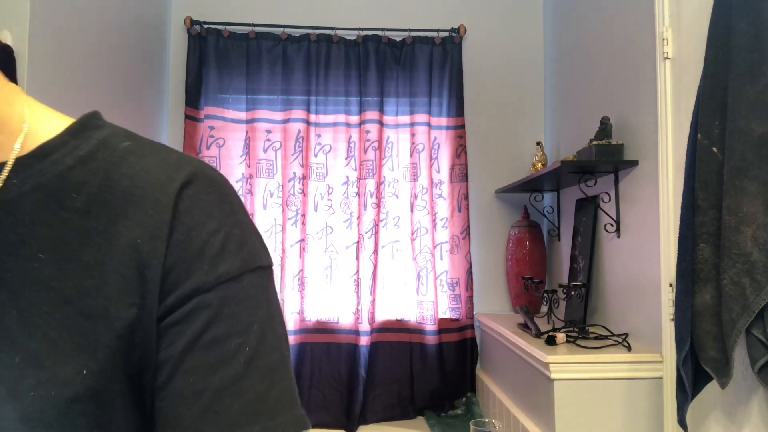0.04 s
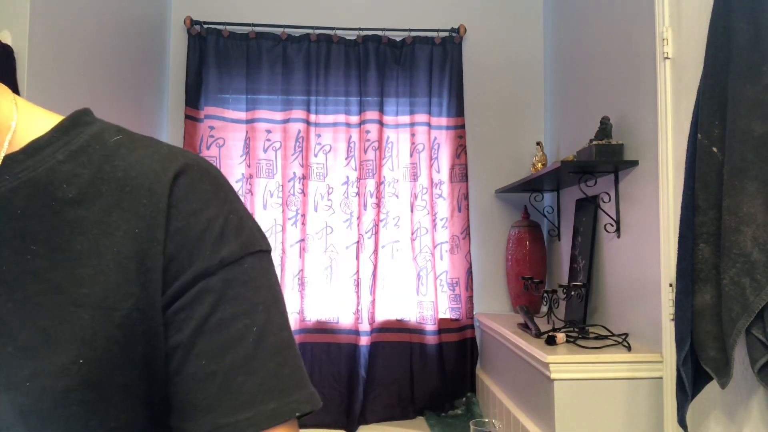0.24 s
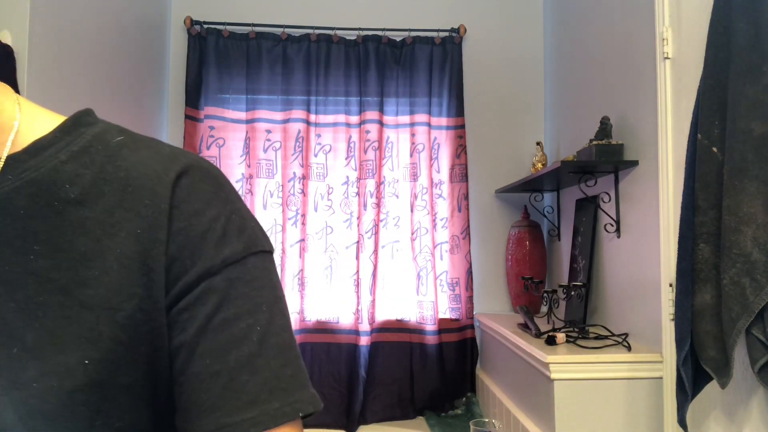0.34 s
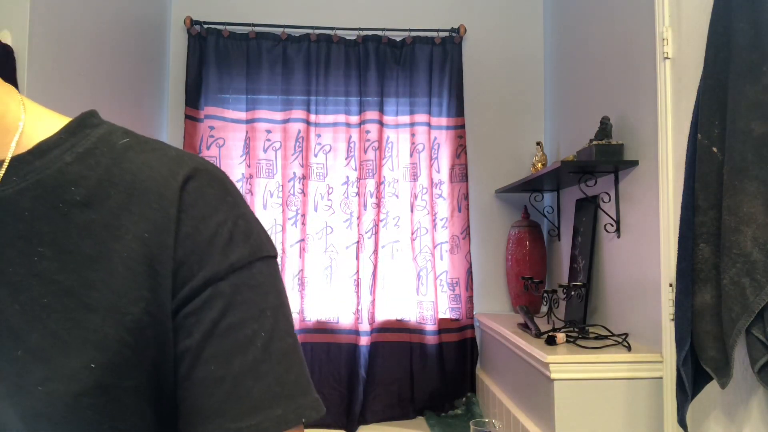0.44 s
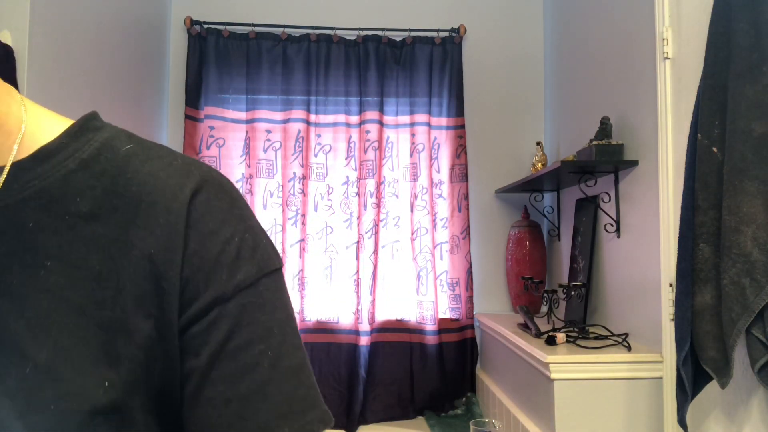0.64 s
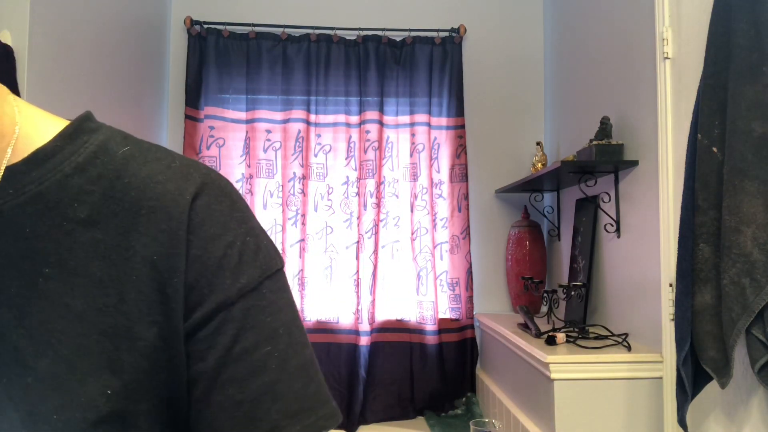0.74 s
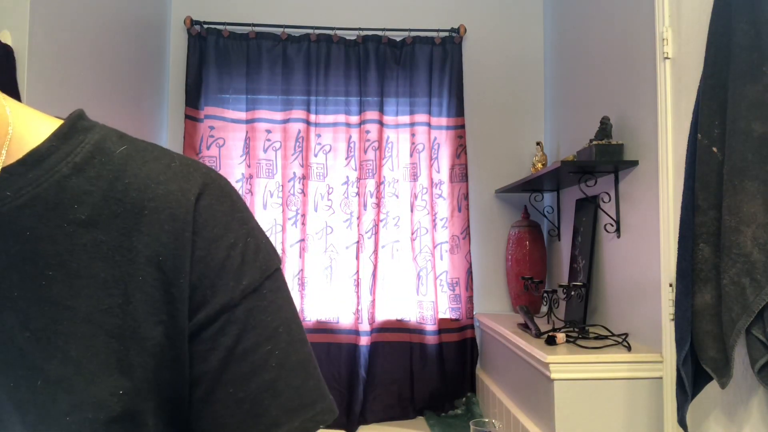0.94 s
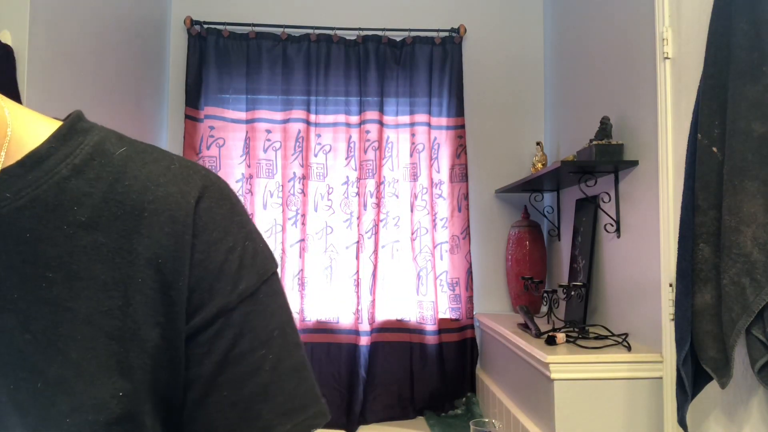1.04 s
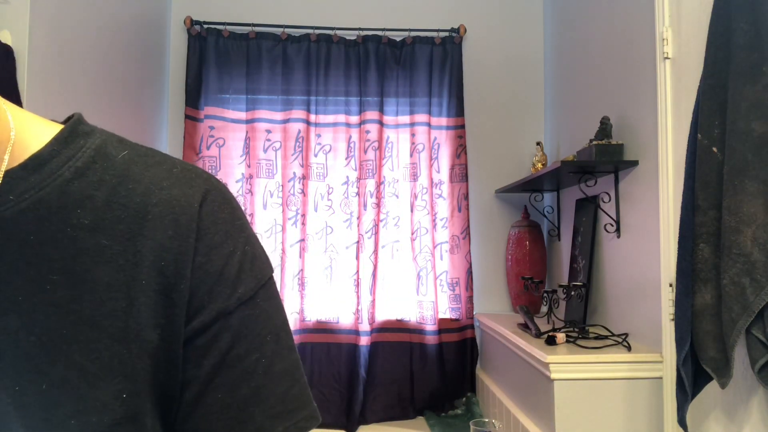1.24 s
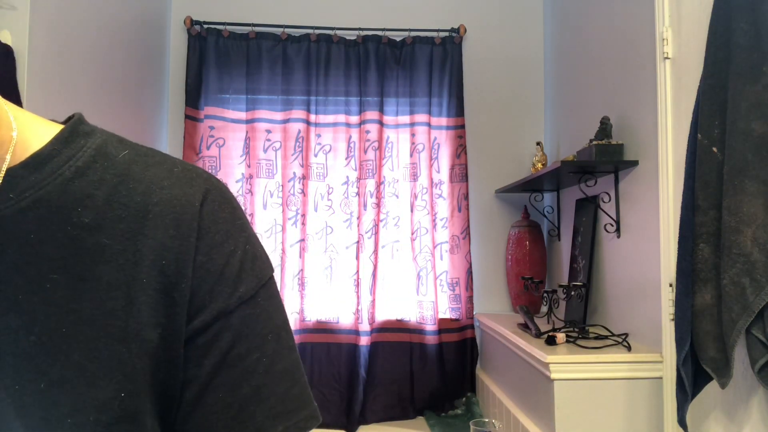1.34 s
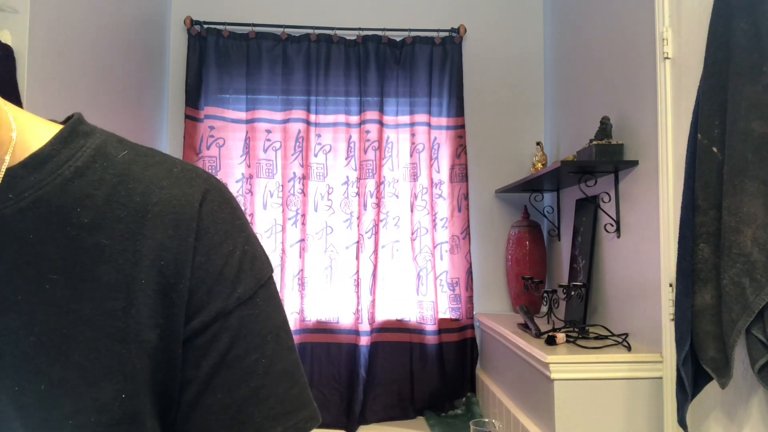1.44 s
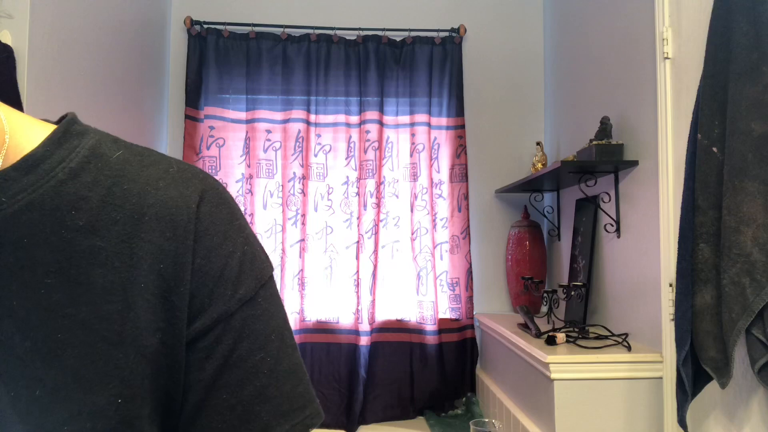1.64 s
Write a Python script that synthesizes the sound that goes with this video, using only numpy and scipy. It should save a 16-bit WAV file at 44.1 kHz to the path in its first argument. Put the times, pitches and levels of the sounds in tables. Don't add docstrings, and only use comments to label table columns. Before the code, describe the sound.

Plastic cosmetic containers clatter in short bursts, with dull thuds from the hollow counter beneath and bright clicks on top, strongest in the second half; lively tiled room, faint hum, close handheld microphone.

```python
import sys
import numpy as np
from scipy import signal
from scipy.fft import rfft, irfft
from scipy.io import wavfile

SR = 44100
rng = np.random.default_rng(int(sys.argv[2]) if len(sys.argv) > 2 else 0)


def file_out(sig):
    cols = np.atleast_2d(sig).T
    lim = np.clip(cols, -1, 1)
    pcm = np.round(lim * 32767).astype(np.int16)
    wavfile.write(sys.argv[1], SR, pcm)


def invert_db(x):
    u = np.asarray(x, float) / 20
    return 10 ** u


N = 74970

# f/Hz, level/dB (per Hz)
HUM_SPECTRUM = [(18, -21), (70, 13), (221, 13), (374, 12), (1250, 5.5), (1720, 1), (7270, -29),
                (13700, -15), (16000, -59)]
# f/Hz, T60/s, level/dB
WALL_DECAY = [(78.5, 0.65, -2.5), (150, 0.54, -25.5), (410, 0.6, -5.5), (1020, 0.37, -5),
              (2740, 0.47, -10.5), (7000, 0.43, -13.5), (11500, 0.24, -22), (15500, .32, -16)]
# t/s, peak
# level/dB, f/Hz, T60/s
BOOMS = [(.32, -33.5, 130, 0.37), (0.27, -24, 190, 0.37), (.312, -33, 400, 0.45), (.3, -30, 212, .4),
         (.33, -36, 500, .5), (.4, -42, 560, .7), (.7415, -17.5, 545, 0.13), (0.748, -28, 68, 0.35),
         (.745, -32, 80, 0.53), (.745, -29, 108, 0.43), (.742, -29.5, 570, 0.68), (0, -39.5, 80, .2),
         (0, -42, 116, 0.28), (0.044, -41.5, 118, .2), (1.105, -45.5, 104, .4), (0.9, -47.5, 71, 0.55),
         (1.2, -46, 80, .5), (1.25, -45, 111, .4), (1.31, -42, 101, .3), (1.365, -40.5, 85, 0.33),
         (1.44, -48, 110, 0.36), (1.58, -52, 70, 0.5), (.178, -37, 240, .4), (.735, -25, 400, .2),
         (.735, -27, 1100, .12), (.8, -36, 250, .6), (1.35, -33, 545, .35), (1.6, -46, 350, .6),
         (.01, -42, 330, .4), (.252, -32, 1500, .1), (.44, -43, 350, .6)]
# f/Hz, level/dB, T60/s
COUNTER_MODES = [(158, -19.5, 0.1), (218.5, -12.5, 0.64), (262, -13, .55), (310, -18, .4), (356, -17, .6),
                 (415, -14, 0.25), (500, -21, 0.4), (570, -19, .35), (690, -24, 0.27), (810, -27, 0.47),
                 (868, -29, 0.24), (1100, -31, 0.05), (1262, -22, 0.089), (1500, -24, 0.034)]
# f/Hz, bandwidth/Hz, level/dB
CASE_MODES = [(2500, 120, -1.5), (4670, 94, -7.5), (5870, 240, -9.5), (7220, 130, -5), (7900, 34, 0),
              (13600, 230, -15)]
# start t/s, length/s, level/dB, brightness f/Hz, relative counter drive/dB
RATTLES = [(-.02, 0.088, -46, 2500, 14), (0.158, 0.091, -56.5, 1800, 20.5), (0.245, 0.017, -32, 2500, 13.5),
           (0.273, 0.046, -27.5, 2500, 9.5), (0.449, 0.028, -54.5, 9000, -11.5),
           (0.635, 0.09, -56, 4000, 4), (0.724, 0.0028, -29, 4870, -2), (0.727, 0.0047, -21.5, 3500, 6),
           (.74, .07, -44, 7000, 0), (1.093, 0.009, -48.5, 3000, 16), (1.131, 0.103, -55, 2780, 20),
           (1.193, 0.0097, -42.5, 3670, 5.5), (1.214, 0.093, -45.5, 2500, 7),
           (1.3, 0.022, -19.5, 5000, -6.5), (1.266, 0.064, -23, 1500, -16), (1.325, 0.096, -31, 5560, -9),
           (1.475, 0.21, -52.5, 3580, 6)]
# t/s, peak level/dB, pitch f/Hz, relative counter ring/dB
THUDS = [(.03, -33, 219, 0), (.044, -28, 404, -6), (.084, -35, 512, -2), (.171, -37, 900, 0),
         (.18, -38, 240, 5), (0.2026, -19.5, 880, -28), (.2035, -27.5, 483, -22), (.251, -20, 390, 5.5),
         (.258, -20, 244, 13), (.297, -14.5, 227, -15), (0.308, -12, 428, -6), (.319, -19, 480, -21),
         (.333, -17.5, 245, 5.5), (0.731, -12, 1124, -7), (.7335, -20, 720, -17), (.746, -22, 700, -15),
         (0.7378, -12.5, 250, -31), (.779, -23.5, 220, -16), (1.096, -30.5, 600, -8),
         (1.098, -29.5, 250, -1), (1.139, -30.5, 600, 2), (1.156, -21, 530, -12), (1.294, -20.5, 488, -29),
         (1.309, -17, 655, -4), (1.343, -17, 292, -4.5), (1.412, -19, 263, -21), (1.4124, -23, 383, -20),
         (1.614, -40, 415, 3), (1.641, -39, 256, 5), (1.679, -35, 540, -15)]
# t/s, peak level/dB, main mode f/Hz, weaker second mode f/Hz, relative
# crack/dB
TICKS = [(.0064, -29, 3520, 2800, -5), (0.0426, -31, 3600, 6140, 5), (0.0696, -23.5, 7100, 2720, -23),
         (0.07, -25, 4860, 4300, -23), (.148, -44, 9300, 11500, 5), (.187, -46, 4530, 7000, 4),
         (0.2513, -27, 2500, 7000, -10), (0.261, -41, 2920, 8650, 9), (.279, -26, 4950, 7930, -4),
         (0.285, -18.5, 4930, 7500, -19), (0.3066, -15.5, 5450, 3700, -28),
         (.601, -57, 5000, 7500, 2), (0.6194, -45, 1050, 6130, 8), (.6374, -54, 3810, 6430, -4),
         (0.6686, -48.5, 2050, 5800, 4), (.681, -50, 1500, 3000, 2), (0.719, -46, 2680, 6740, 14),
         (0.7296, -11.5, 2304, 4160, -1), (0.7332, -14.5, 4870, 7200, 1.5),
         (0.7349, -17.5, 7300, 14500, 6.5), (.7365, -19, 14600, 12500, -12),
         (0.7377, -12.5, 5800, 2500, -18), (0.995, -46.5, 2520, 4930, 1),
         (1.0645, -59, 5370, 8100, 3),
         (1.0964, -35.5, 1950, 5000, 2.5), (1.1028, -35, 1840, 3900, -14),
               (1.154, -29, 2500, 7600, -23), (1.156, -26, 5400, 3120, -24), (1.1768, -32, 2760, 6440, 0),
               (1.2023, -24, 3600, 4700, 9.5), (1.2093, -27.5, 4800, 5900, 5), (1.254, -27, 3400, 8100, 15),
               (1.265, -24, 3320, 8800, -1), (1.2805, -31, 2700, 5500, 0), (1.2866, -15, 4870, 2500, -4),
               (1.2889, -19.5, 9000, 4900, 11.5), (1.3059, -19, 2500, 5950, 13),
               (1.311, -22, 6300, 3500, 6), (1.3185, -22.5, 2850, 7300, 11), (1.332, -24, 14600, 4000, 4),
               (1.3366, -14, 4600, 3940, 5), (1.3384, -13, 5000, 4240, -2), (1.3419, -10, 12900, 9400, -9),
               (1.3407, -3.5, 7390, 8150, 0.5), (1.3851, -8.5, 5660, 2760, -3.5),
               (1.517, -38, 3250, 8000, 0), (1.5575, -28, 4250, 8300, 5), (1.56, -35, 1710, 5550, -6),
               (1.5709, -38.5, 1660, 7900, 8), (1.6757, -34, 3770, 7200, -0.5), (1.684, -44, 2620, 1800, 1)]

HUM_DB = -59
ROOM_GAP_S = 0.0011
TICK_WET_DB, THUD_WET_DB, RATTLE_WET_DB = 0.5, -1.5, 0.3
BOOM_RISE_S, BOOM_WOBBLE_DB, BOOM_WOBBLE_S = 0.0022, 4, 0.018
COUNTER_DAMP = 0.25
RATTLE_PER_S, RATTLE_SCATTER_DB = 9000, 2.5
RATTLE_EDGE_S, RATTLE_SWELL, RATTLE_FADE_S = 0.00068, 0.11, 0.027
THUD_CYCLES, THUD_TRIM_DB = 2.24, 7.5
TICK_WIDTH, TICK_SECOND_DB, TICK_RISE_S, TICK_TRIM_DB = 0.09, -10, 0.00039, 8
CRACK_DB, CRACK_S, CRACK_HZ = -13, 0.0022, 3400
MIC_LOW_HZ, MIC_ROLL_HZ, TOP_HZ, LIMIT = 51.6, 9000, 15700, 1


def level(x, db):
    return x * invert_db(db) / np.sqrt(np.mean(x ** 2))


def band(x, hz, width):
    return signal.lfilter(*signal.iirpeak(min(hz, .45 * SR), hz / max(width, 5), fs=SR), x)


def along(table, hz, axis):
    table = np.array(table)
    return np.interp(np.log(hz), np.log(table[:, 0]), table[:, axis])


def decay(t, t60):
    return np.exp(-np.log(1000) * t / t60)


def ring(hz, t60, size):
    t = np.arange(size) / SR
    return np.sin(2 * np.pi * hz * t) * decay(t, t60)


def add(out, s, sound):
    i = max(int(s * SR), 0)
    out[i:i + len(sound)] += sound[:N - i]


def hum():
    hz = np.maximum(np.fft.rfftfreq(N, 1 / SR), 1)
    spectrum = rfft(rng.standard_normal(N)) * invert_db(along(HUM_SPECTRUM, hz, axis=1))
    return level(irfft(spectrum, N), HUM_DB)


def room(x):
    t = np.arange(int(.7 * SR)) / SR
    tail = 0
    for hz in 60 * 2 ** np.arange(0, 8.1, .5):
        fade = decay(t, along(WALL_DECAY, hz, axis=1))
        noise = rng.standard_normal(len(t))
        noise = band(band(noise, hz, hz / 2), hz, hz / 2)
        gain = 1.864 * invert_db(along(WALL_DECAY, hz, axis=2)) / np.sqrt(np.sum(fade ** 2))
        tail = tail + gain * noise * fade
    onset = np.clip(t / ROOM_GAP_S - .5, 0, 1)
    return signal.fftconvolve(x, tail * onset)[:N]


def booms():
    out, t = np.zeros(N), np.arange(SR // 2) / SR
    rise = 1 - np.exp(-t / BOOM_RISE_S)
    for s, db, hz, t60 in BOOMS:
        wobble = np.interp(t, np.arange(64) * BOOM_WOBBLE_S, np.tanh(rng.standard_normal(64)))
        wobble = wobble * np.minimum(t / BOOM_WOBBLE_S / 2, 1)
        add(out, s, invert_db(db + BOOM_WOBBLE_DB * wobble) * ring(hz, t60, len(t)) * rise)
    return out


def counter(force):
    body = 0
    for hz, db, t60 in COUNTER_MODES:
        body = body + invert_db(db) * ring(hz, min(t60, .7) * COUNTER_DAMP, SR // 2)
    return signal.fftconvolve(force, body)[:N]


def contact_grit():
    t, chance = np.arange(N) / SR, rng.random((3, N))
    struck = chance[0] < RATTLE_PER_S / SR
    sign = np.sign(chance[1] - .5)
    strength = invert_db(-RATTLE_SCATTER_DB * np.log(chance[2] + .02))
    clumps_db = 3 * np.interp(t, np.arange(600) * .003, rng.standard_normal(600))
    return level(struck * sign * strength * invert_db(clumps_db), 0)


def rattles():
    t, grit = np.arange(N) / SR, contact_grit()
    out, force = np.zeros(N), np.zeros(N)
    for s, length, db, hz, drive_db in RATTLES:
        swell = np.clip((t - s) / (RATTLE_EDGE_S + RATTLE_SWELL * length), 0, 1)
        fade = np.exp(-np.maximum(t - s - length, 0) / RATTLE_FADE_S)
        contacts = grit * swell * fade * invert_db(db)
        out += band(band(contacts, hz, 2.2 * hz), hz, 2.2 * hz)
        force += contacts * invert_db(drive_db)
    cases = sum(invert_db(db) * band(out, hz, width) for hz, width, db in CASE_MODES)
    hollow = band(force, 610, 760)
    return 0.5 * out + 1.22 * cases + 1.14 * hollow + 0.029 * counter(force)


def thuds():
    out, force, t = np.zeros(N), np.zeros(N), np.arange(4096) / SR
    for s, db, hz, ring_db in THUDS:
        rise = 1 - np.exp(-(t * hz / 0.44) ** 2)
        knock = ring(hz, 3 * THUD_CYCLES / hz, len(t)) * rise
        add(out, s, invert_db(db + THUD_TRIM_DB) * band(knock, hz, 4.7 * hz))
        push = np.hanning(int(SR / hz / 2) + 3)
        add(force, s, invert_db(db + ring_db) * push / push.sum() / 3)
    return out + counter(force)


def ticks():
    out, t = np.zeros(N), np.arange(2048) / SR
    envelope = np.exp(-t / CRACK_S) * (1 - np.exp(-(t / TICK_RISE_S) ** 2))
    for s, db, main_hz, second_hz, crack_db in TICKS:
        burst = rng.standard_normal(len(t)) * envelope
        low = band(burst, main_hz, TICK_WIDTH * main_hz)
        high = band(burst, second_hz, TICK_WIDTH * second_hz)
        modes = low / np.abs(low).max() + invert_db(TICK_SECOND_DB) * high / np.abs(high).max()
        crack = invert_db(CRACK_DB + crack_db) * band(burst, CRACK_HZ, 2 * CRACK_HZ)
        add(out, s, invert_db(db + TICK_TRIM_DB) * (0.29 * modes + crack))
    return out


def scene():
    contacts = np.array([ticks(), thuds(), rattles()])
    contacts = signal.sosfilt(signal.butter(2, 105, "high", fs=SR, output="sos"), contacts)
    wet_dbs = (TICK_WET_DB, THUD_WET_DB, RATTLE_WET_DB)
    wet = sum(invert_db(db) * room(x) for x, db in zip(contacts, wet_dbs))
    return (contacts.sum(axis=0) + wet + booms() + hum())[None]


def low_pass(x):
    return signal.sosfilt(signal.butter(12, 16690, fs=SR, output="sos"), x)


def record(dry):
    x = signal.sosfilt(signal.butter(3, MIC_LOW_HZ, "high", fs=SR, output="sos"), dry)
    x = signal.sosfilt(signal.butter(1, MIC_ROLL_HZ, fs=SR, output="sos"), x)
    x = signal.sosfilt(signal.ellip(8, .2, 40, TOP_HZ, fs=SR, output="sos"), x)
    mix = LIMIT * np.tanh(x / LIMIT)
    return low_pass(mix)


dry = scene()
out = record(dry)
file_out(out)
```